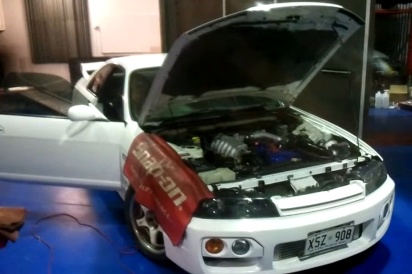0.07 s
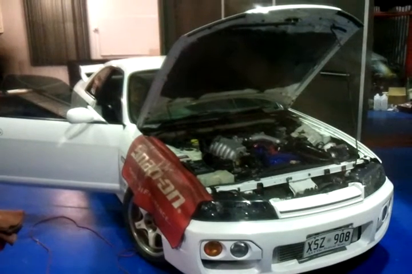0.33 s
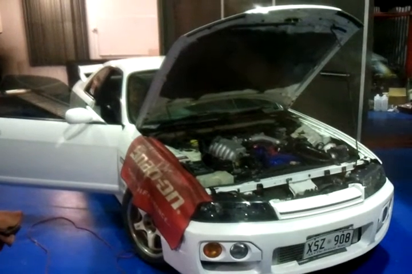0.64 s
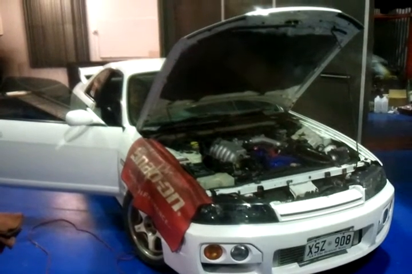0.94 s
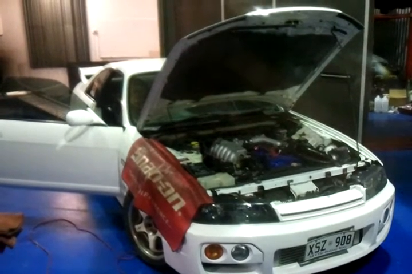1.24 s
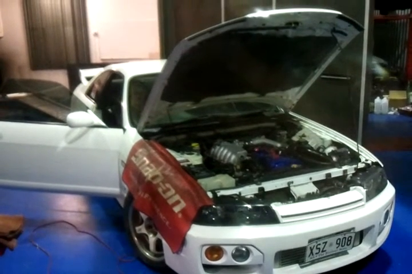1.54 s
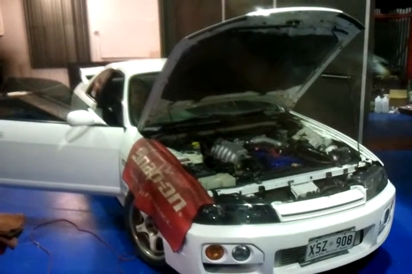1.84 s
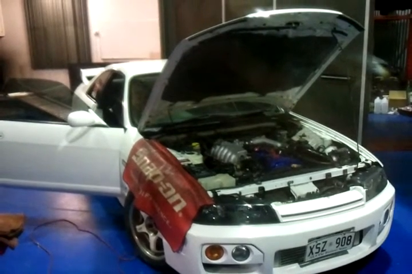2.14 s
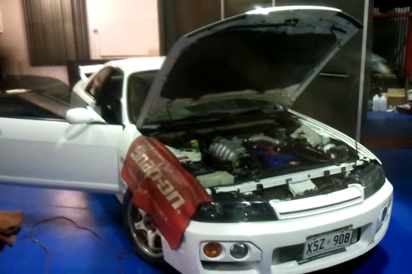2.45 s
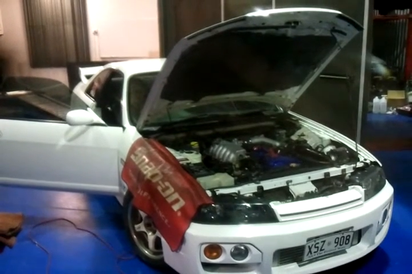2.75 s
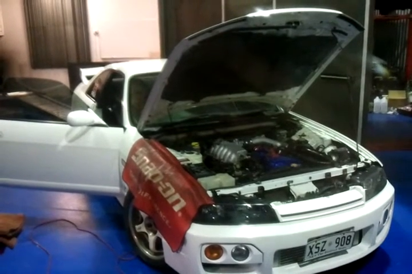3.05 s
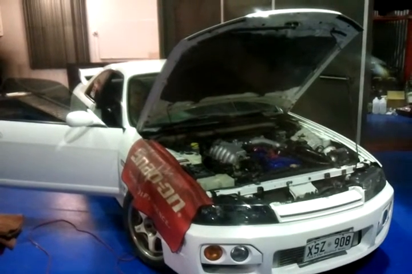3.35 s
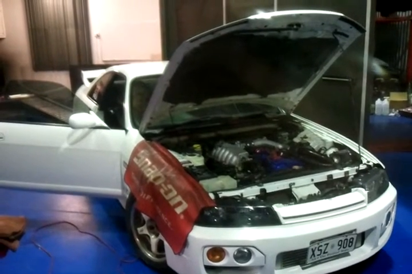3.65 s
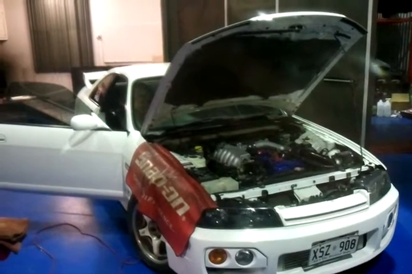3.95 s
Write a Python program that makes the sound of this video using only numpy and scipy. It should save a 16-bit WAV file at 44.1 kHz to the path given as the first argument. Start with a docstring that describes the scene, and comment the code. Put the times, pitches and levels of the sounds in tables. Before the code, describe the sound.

A car engine cranks on a grinding, whining starter, then catches with a brief belt squeal.

```python
"""A quiet garage: a petrol car is started with its bonnet open.
A relay clicks and the fuel pump primes; the starter slams in and grinds, whining under load.
Single cylinders cough through the exhaust pipe and the starter gear clatters at each compression.
The engine catches and runs up; its belt slips and squeals."""
import sys
import numpy as np
from scipy import signal
from scipy.io import wavfile

SR = 44100
rng = np.random.default_rng(int(sys.argv[2]) if len(sys.argv) > 2 else 0)


def log_audio(samples):
    """Write samples as a 16-bit WAV file to the path given in sys.argv[1]."""
    # one column per channel
    frames = np.atleast_2d(samples).T
    # limit to full scale, then quantise
    limited = np.clip(frames, -1, 1)
    pcm = np.round(limited * 32767).astype(np.int16)
    wavfile.write(sys.argv[1], SR, pcm)


N = 176400
TIME = np.arange(N) / SR
FLUTTER_HZ, FLUTTER_DEPTH = 28, 0.33
# flywheel overruns the pinion: start_s, clatter_gain_db, whirr_pitch_hz, whirr_gain_db
OVERRUNS = [(2.319, 1, 1530, -2), (2.408, -1.5, 1520, 3.5), (2.473, -9.5, 1430, -4.5),
            (2.6, 0.5, 1700, 3.5), (2.689, -0.5, 1630, 2), (2.778, -0.5, 1580, 0.5), (2.891, 0, 1570, 2),
            (3.014, -1, 1560, 1), (3.104, -0.5, 1620, 2), (3.224, 0, 1600, -1.5), (3.305, -2, 1580, -3),
            (3.38, 0.5, 1690, 1), (3.471, -12, 1430, -4)]


def from_db(db):
    """Decibels to gain."""
    return 10 ** (np.asarray(db) / 20)


def rms_one(x):
    """Scale to unit rms."""
    return x / np.sqrt(np.mean(x ** 2) + 1e-20)


def level(rows):
    """Gain along (time_s, level_db) rows; silent before the first."""
    return from_db(np.interp(TIME, *np.transpose(rows), left=-150))


def smooth(x, hz):
    """Two one-pole low-passes in series."""
    pole = np.exp(-2 * np.pi * hz / SR)
    return signal.lfilter([(1 - pole) ** 2], [1, -2 * pole, pole * pole], x + 1e-18)


def noise(spectrum):
    """Third-octave noise bands shaped by (freq_hz, density_db) rows; unit rms."""
    hz, db = np.transpose(spectrum)
    edges_hz = 20 * 2 ** (np.arange(28) / 3)
    white = rng.standard_normal((2, N + SR // 4))
    out = 0
    for k, (low, high) in enumerate(zip(edges_hz, edges_hz[1:])):
        centre = np.sqrt(low * high)
        if hz.min() / 2 < centre < hz.max() * 2:
            outside_oct = abs(np.log2(centre / np.clip(centre, hz.min(), hz.max())))
            gain = from_db(np.interp(np.log(centre), np.log(hz), db) - 20 * outside_oct)
            band = signal.butter(2, [low, high], "band", fs=SR, output="sos")
            out = out + gain * signal.sosfilt(band, white[k % 2])
    return rms_one(out[-N:])


def burst(start_s, attack_s, hold_s, t60_s):
    """Linear rise; exponential decay from hold_s after the start."""
    age = TIME - start_s
    return np.clip(age / attack_s, 0, 1) * from_db(-60 * np.maximum(age - hold_s, 0) / t60_s)


def whistle(hz, width_hz):
    """Tone widened by phase wander; unit rms."""
    wander = np.sqrt(2 * np.pi * abs(width_hz) / SR) * rng.standard_normal(N)
    return np.sqrt(2) * np.sin(np.cumsum(2 * np.pi * hz / SR + wander))


def glide(rows, width_hz):
    """Rough whistle along (time_s, pitch_hz, level_db) rows."""
    time_s, hz, db = np.transpose(rows)
    gain = from_db(np.interp(TIME, time_s, db, left=-150, right=-150))
    return gain * whistle(np.interp(TIME, time_s, hz), width_hz)


def knocks(rows, spectrum, t60_s):
    """Metal contacts at (start_s, level_db) rows, sharing one spectrum."""
    return noise(spectrum) * sum(from_db(db) * burst(s, 0.00028, 0.00043, t60_s) for s, db in rows)


def reverb(x, wet_db, t60_s=0.7):
    """Direct sound plus dense reflections; default decay is the garage's."""
    age = TIME[:SR]
    tail = rng.standard_normal(SR) * from_db(-60 * age / t60_s) * (age > .003)
    return x + from_db(wet_db) * signal.fftconvolve(x, tail / np.linalg.norm(tail))[:N]


def gears():
    """Rasp, growl and clatter, reflected in the engine bay and chopped by meshing teeth."""
    # gear and valve-train rasp, housing and block growl: time_s, level_db
    rasp_levels = [(1.786, -49), (1.806, -21), (1.85, -28.5), (2.1, -28.5), (2.21, -32), (2.4, -29),
                   (3.66, -29), (3.77, -32.5), (3.87, -29), (4, -29.5)]
    growl_levels = [(1.794, -54), (1.802, -34.5), (1.9, -29.5), (2.12, -32), (2.28, -35), (2.4, -29.5),
                    (2.56, -33.5), (2.85, -30), (3.45, -32), (3.62, -36), (3.78, -42.5), (3.94, -37),
                    (3.98, -38)]
    # their spectra and the gear clatter's: freq_hz, density_db
    rasp_spectrum = [(1000, -37.5), (2000, -10.5), (2700, -8.5), (3600, -4), (5400, 3.5), (7600, 3),
                     (8400, -1)]
    growl_spectrum = [(60, 6.5), (130, -5.5), (210, -4.5), (520, -4.5), (740, 2), (1450, 2.5), (1900, -2),
                      (3000, -4), (5000, -3)]
    clatter_spectrum = [(250, -4), (700, -7), (1100, 4), (1550, 3.5), (2400, -27), (3600, -6.5),
                        (5200, 1.5), (7500, 2.5), (8400, -15)]
    hits = sum(from_db(db - 21.5) * burst(start_s, attack_s=0.0076, hold_s=0.0095, t60_s=0.17)
               for start_s, db, _, _ in OVERRUNS)
    teeth = rms_one(1 + 0.24 * whistle(hz=661, width_hz=350))
    rasp, growl, clatter = (rms_one(reverb(noise(spectrum), wet_db=-3.5, t60_s=0.15))
                            for spectrum in (rasp_spectrum, growl_spectrum, clatter_spectrum))
    return teeth * (level(rasp_levels) * rasp + level(growl_levels) * growl + hits * clatter)


def grind():
    """Coarse grinding of the loaded starter gear."""
    # grinding: freq_hz, density_db
    spectrum = [(650, -14.5), (900, 5.5), (1100, 0.5), (1600, -3.5)]
    return from_db(-33.5) * noise(spectrum) * burst(2.03, attack_s=0.019, hold_s=0.12, t60_s=0.71)


def starter_tones():
    """The starter whines against two compressions; its gears chirp as the speed swings."""
    # gear chirp: time_s, pitch_hz, level_db
    chirp = [(1.895, 4180, -40), (1.908, 4190, -27), (1.922, 4300, -35), (1.936, 4500, -29),
             (1.964, 4600, -34), (2.0, 4800, -55), (2.09, 4750, -52), (2.129, 4450, -28),
             (2.147, 4220, -32), (2.175, 4200, -55)]
    # groans and whines: start_s, hold_s, pitch_hz, level_db, width_hz
    whines = [(1.842, 0.029, 214.5, -38.5, 14), (1.9, 0.12, 664, -31.5, 15.6),
              (1.955, 0.036, 4455, -31, 15), (1.97, .06, 4220, -41, 25), (2.055, 0.074, 724, -37.5, 22),
              (2.117, 0.12, 661, -32, 18.6), (2.13, 0.15, 4220, -39.5, 20), (2.151, 0.11, 4500, -33, 30)]
    out = glide(chirp, width_hz=90)
    for start_s, hold_s, hz, db, width_hz in whines:
        flutter = rms_one(1 + FLUTTER_DEPTH * whistle(FLUTTER_HZ, width_hz=30))
        envelope = from_db(db) * burst(start_s, attack_s=0.012, hold_s=hold_s, t60_s=0.38)
        out = out + envelope * flutter * whistle(hz, width_hz)
    return out


def freewheel():
    """Each overrun spins the freewheel up; its tone sags while the housing rings along."""
    # housing tones: pitch_hz, level_db, width_hz
    housing_tones = [(680, -43, 21.7), (741.5, -41, 32.3), (1405, -40, 31.8)]
    sag_hz_per_s = 708
    whirr, housing_gain = 0, 0
    for start_s, _, hz, db in OVERRUNS:
        pitch_hz = hz - sag_hz_per_s * np.clip(TIME - start_s, 0, .5)
        envelope = from_db(db - 33) * burst(start_s, attack_s=0.0099, hold_s=0.02, t60_s=0.64)
        whirr = whirr + envelope * whistle(pitch_hz, width_hz=44.3)
        housing_gain = np.maximum(housing_gain, burst(start_s, attack_s=0.02, hold_s=0.058, t60_s=0.41))
    housing = sum(from_db(db) * whistle(hz, width_hz) for hz, db, width_hz in housing_tones)
    flutter = 1 + FLUTTER_DEPTH * whistle(FLUTTER_HZ, width_hz=10.5)
    return (whirr + housing_gain * housing) * flutter


def exhaust():
    """Each firing is a soft puff that rings the pipe: first singly, then faster and brighter."""
    # lone firings: start_s, gain_db, cutoff_hz
    lone_firings = [(2.031, -0.5, 67.5), (2.283, 2.5, 84), (2.302, 0.5, 220), (2.570, 3, 130),
                    (2.863, -4, 61), (3.067, -5, 100), (3.089, 1, 60), (3.271, 6, 142), (3.504, 4, 80),
                    (3.53, -1.5, 262)]
    # run-up: time_s, firings_per_s, gain_db, tilt_db_per_oct
    run_up = [(3.621, 17, 4.5, 4), (3.69, 25, 6.5, 4.5), (3.739, 24, 4.5, 3), (3.799, 28.5, 5, 2),
              (3.869, 39.5, 3, 3.5), (3.948, 55, 5.5, 14), (4, 63, -2, 8)]
    # pipe resonances: freq_hz, gain_db, t60_s
    pipe_modes = [(44.9, -14.5, 0.45), (78.6, -24, 0.52), (101, -25.5, .28), (132.5, -34.5, 0.3),
                  (159, -28, 0.29), (184, -34, 0.36)]
    muffler_hz, bass_cut_hz, pivot_hz = 226, 34.3, 109
    time_s, rate, db, tilt = np.transpose(run_up)
    cycles = np.cumsum(np.interp(TIME, time_s, rate, left=0)) / SR
    firings = np.diff(np.ceil(cycles), prepend=0) * from_db(np.interp(TIME, time_s, db))
    coughs = sum(from_db(cough_db) * smooth(signal.unit_impulse(N, int(start_s * SR)), cutoff_hz)
                 for start_s, cough_db, cutoff_hz in lone_firings)
    roughness = 1 + 0.17 * rms_one(smooth(rng.standard_normal(N), hz=500))
    puffs = (smooth(firings, hz=185) + coughs) * roughness
    tilt_db_per_oct = np.interp(TIME, time_s, tilt)
    pipe = 0
    for hz, mode_db, t60_s in pipe_modes:
        radius, angle = from_db(-60 / (t60_s * SR)), 2 * np.pi * hz / SR
        drive = puffs * from_db(mode_db + tilt_db_per_oct * np.log2(hz / pivot_hz))
        pipe = pipe + signal.lfilter([.5, 0, -.5], [1, -2 * radius * np.cos(angle), radius ** 2], drive)
    muffled = signal.sosfilt(signal.butter(2, muffler_hz, fs=SR, output="sos"), pipe)
    return signal.sosfilt(signal.butter(2, bass_cut_hz, "high", fs=SR, output="sos"), muffled)


def belt():
    """The slipping belt scrubs on its pulley; its squeal jumps between pitches."""
    # scrub: freq_hz, density_db
    spectrum = [(700, -4.5), (6500, -3)]
    # squeal: time_s, pitch_hz, level_db
    squeal = [(3.925, 5614, -45), (3.938, 5727, -26), (3.95, 5800, -22), (3.959, 6300, -16.5),
              (3.966, 7000, -13.5), (3.971, 5156, -16.5), (3.98, 5078, -10), (3.985, 6490, -17.5),
              (3.992, 7060, -14.5), (4.03, 7160, -38)]
    start_s, attack_s = 3.961, 0.0054
    scrub = from_db(-31.5) * noise(spectrum) * np.clip((TIME - start_s) / attack_s, 0, 1)
    return scrub + reverb(glide(squeal, width_hz=150), wet_db=-0.5)


def solenoid():
    """The pinion knocks on the ring gear; the solenoid shuts and bounces, ringing the steel."""
    # pinion knock: freq_hz, density_db
    spectrum = [(600, -15), (1250, 3), (2000, -19)]
    # contacts: start_s, level_db
    contacts = [(1.8035, -26), (1.807, -18.5), (1.8086, -10), (1.8128, -16), (1.818, -25)]
    # steel resonances: freq_hz, gain_db, t60_s
    steel_modes = [(1200, -15, .008), (4200, -18, 0.0052), (5100, -17.5, 0.31), (5300, 1.5, .011),
                   (6020, -6, .004), (7150, -2, .004)]
    knock = knocks([(1.7975, -26.5)], spectrum, t60_s=0.05)
    age = TIME[:SR // 2]
    ring = sum(from_db(db - 60 * age / t60_s) * np.sin(2 * np.pi * hz * age)
               for hz, db, t60_s in steel_modes)
    slam = np.zeros(N)
    for start_s, db in contacts:
        first = int(start_s * SR)
        slam[first:first + len(ring)] += from_db(db) * ring
    return knock + reverb(slam, wet_db=-7.5)


def engine_rush():
    """Low turbulence of the running engine."""
    # swell: time_s, level_db
    levels = [(3.6, -43), (3.675, -30.5), (3.78, -38.5), (3.97, -30)]
    # turbulence: freq_hz, density_db
    spectrum = [(130, 2.5), (250, -8.5), (600, -18)]
    return level(levels) * noise(spectrum)


def relay():
    """One sharp click with a faint tail."""
    # contact: start_s, level_db
    click = [(.2535, -34)]
    # its ring: freq_hz, density_db
    spectrum = [(300, 3), (1100, -19), (2400, -27), (4800, 4), (7000, -5.5)]
    return knocks(click, spectrum, t60_s=0.028) + from_db(-18) * knocks(click, spectrum, t60_s=1)


def fuel_pump():
    """The pump primes in one short surge, then hums on briefly."""
    # surge: freq_hz, density_db
    spectrum = [(100, -10), (195, -5.5), (386, -2.5), (895, -9), (1170, -16.5), (3000, -42)]
    start_s, t60_s = 0.295, 0.72
    surge = noise(spectrum) * burst(start_s, attack_s=0.0049, hold_s=0.12, t60_s=t60_s)
    hum = whistle(hz=134, width_hz=0.65) * burst(start_s, attack_s=0.44, hold_s=0.75, t60_s=t60_s)
    return from_db(-47) * surge + from_db(-61) * hum


def ignition_key():
    """The key turns just before the starter engages."""
    # key noise: freq_hz, density_db
    spectrum = [(1000, 8), (1800, -21), (8000, -2)]
    return from_db(-51) * noise(spectrum) * burst(1.727, attack_s=0.002, hold_s=0.038, t60_s=0.73)


def background():
    """Still garage air and a faint hum."""
    # air: freq_hz, density_db
    spectrum = [(40, 3.5), (180, -6), (500, -12), (2200, -21), (7500, -24)]
    # hum: pitch_hz, level_db
    hum = [(140, -66.5)]
    return from_db(-54.5) * noise(spectrum) + sum(from_db(db) * whistle(hz, 1.1) for hz, db in hum)


def scene():
    """All sources heard from in front of the car; same on both channels."""
    mono = (engine_rush() + background() + relay() + fuel_pump() + ignition_key() + solenoid()
            + gears() + grind() + starter_tones() + freewheel() + exhaust() + belt())
    return np.array([mono, mono])


def record(dry):
    """Steep low-pass plus a small DC offset."""
    stopband_hz, dc_offset = 9200, 0.0125
    return signal.sosfilt(signal.cheby2(16, 70, stopband_hz, fs=SR, output="sos"), dry) + dc_offset


dry = scene()
out = record(dry)
log_audio(out)
```